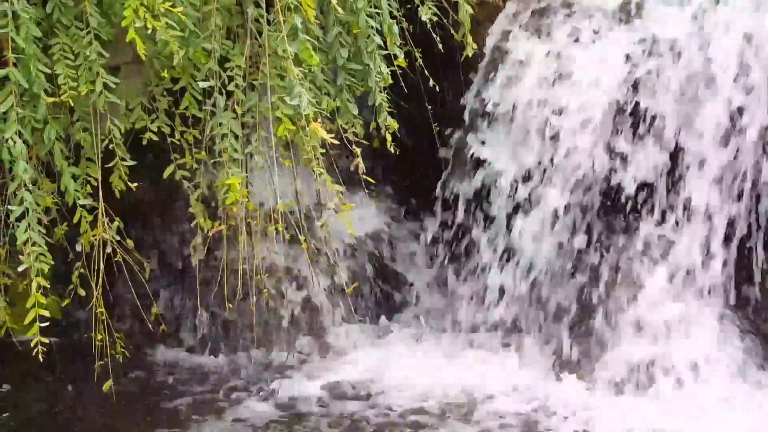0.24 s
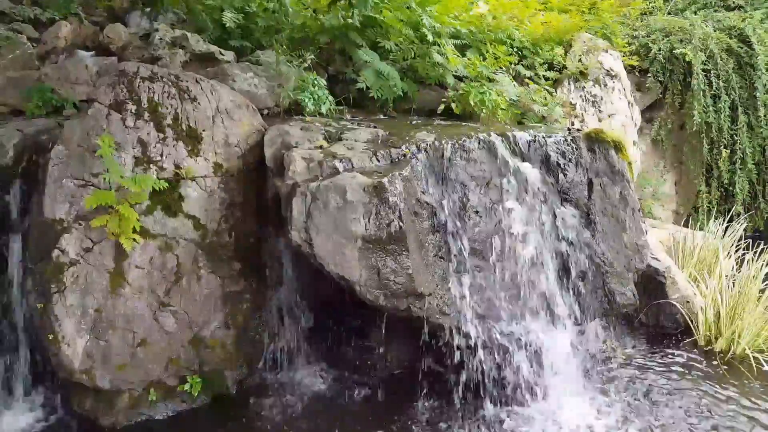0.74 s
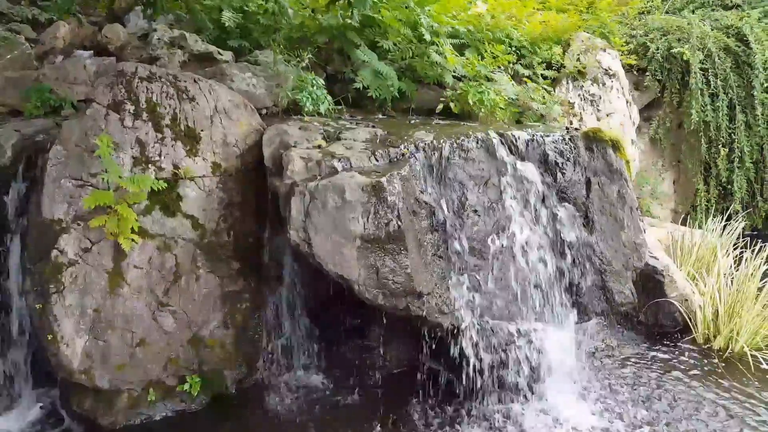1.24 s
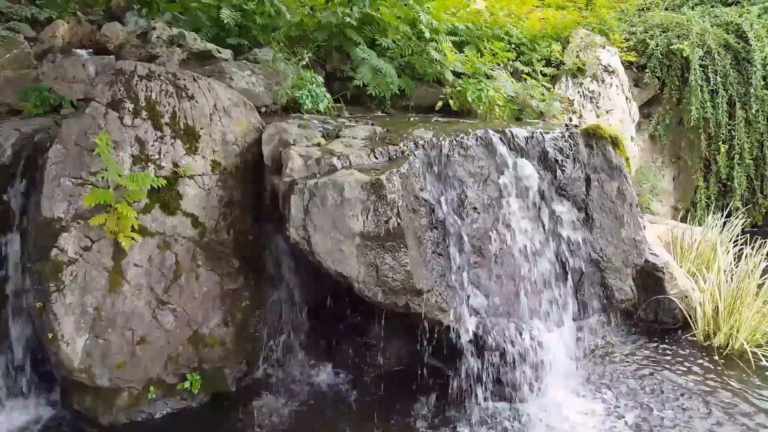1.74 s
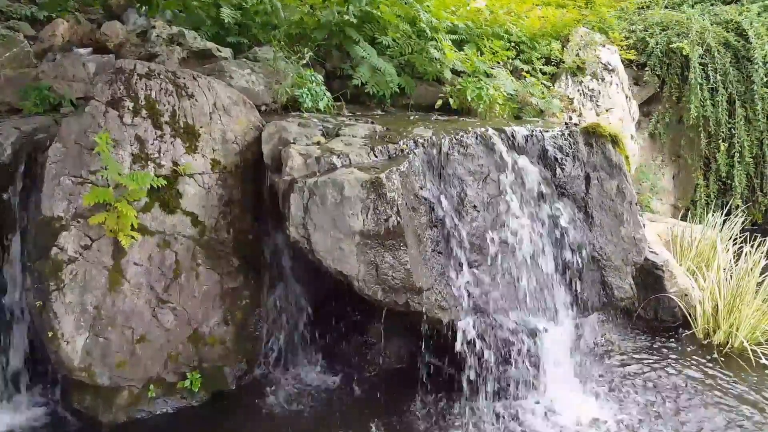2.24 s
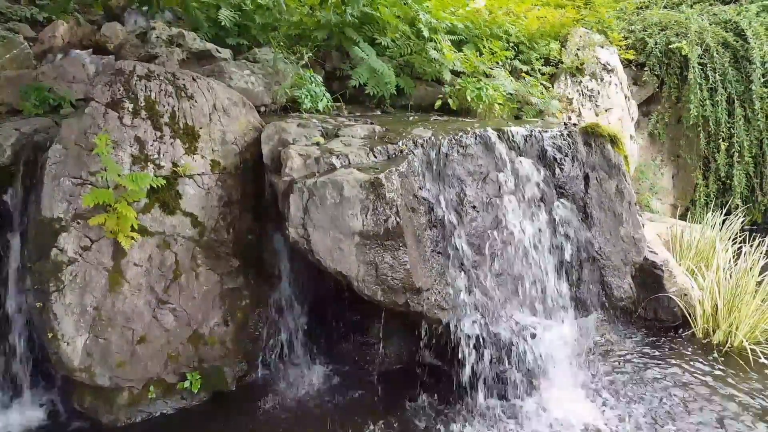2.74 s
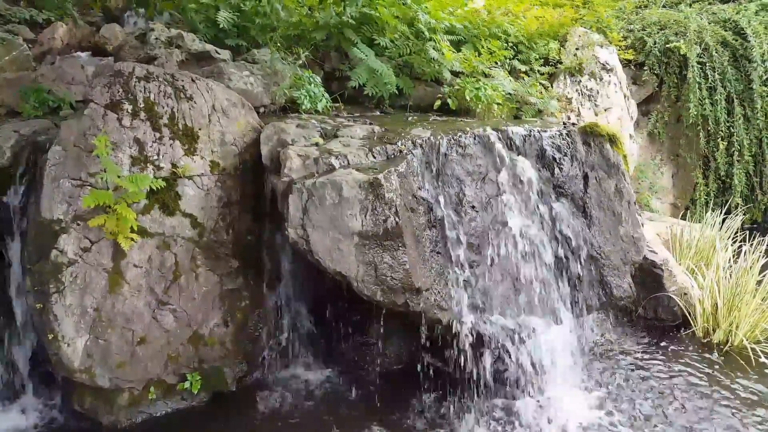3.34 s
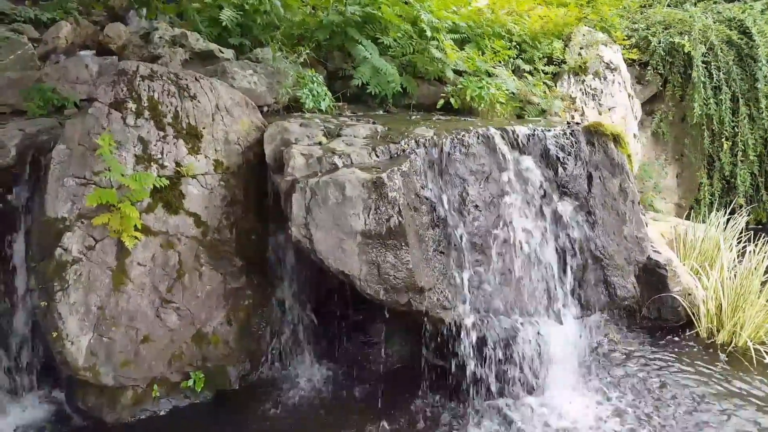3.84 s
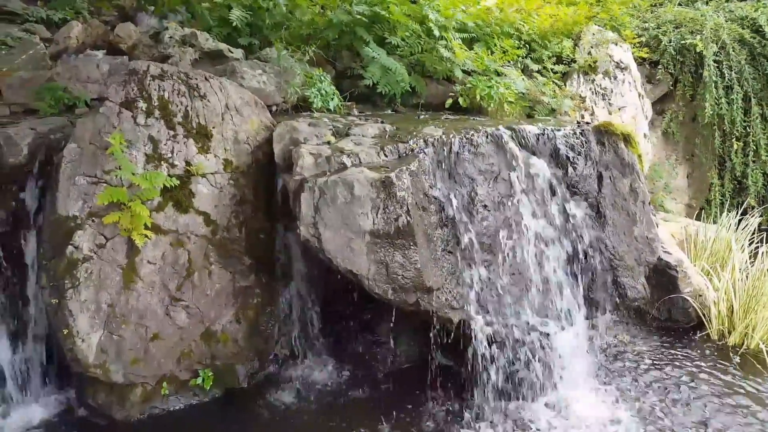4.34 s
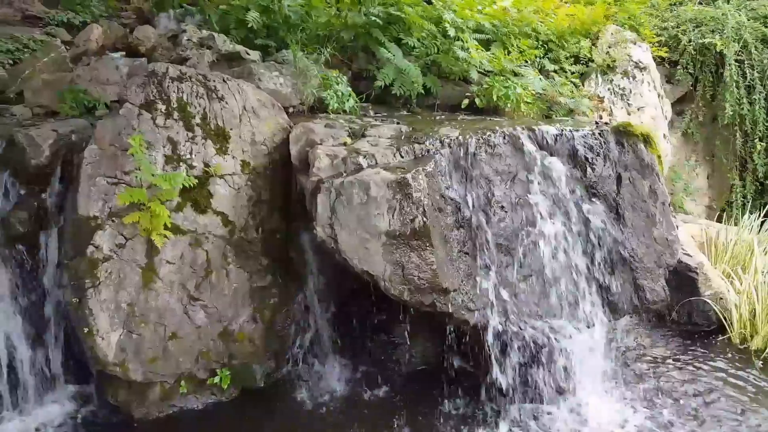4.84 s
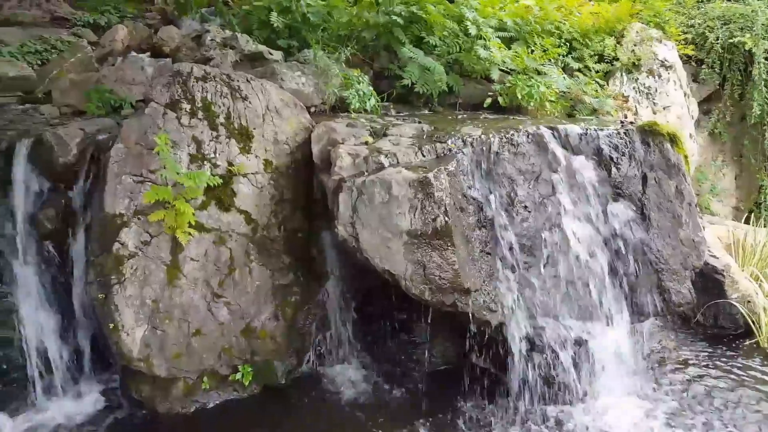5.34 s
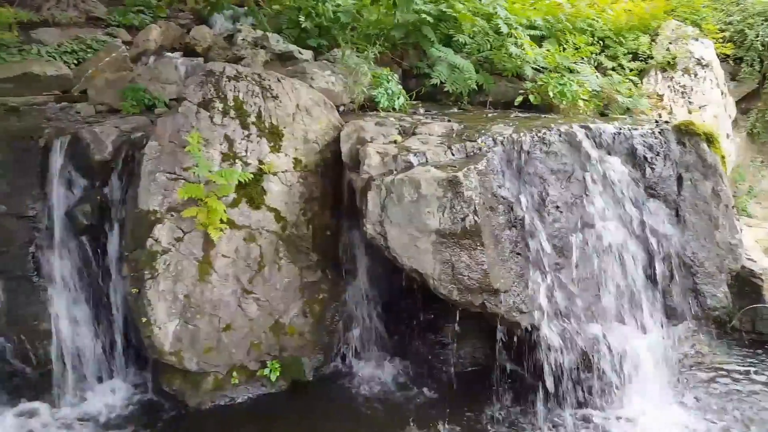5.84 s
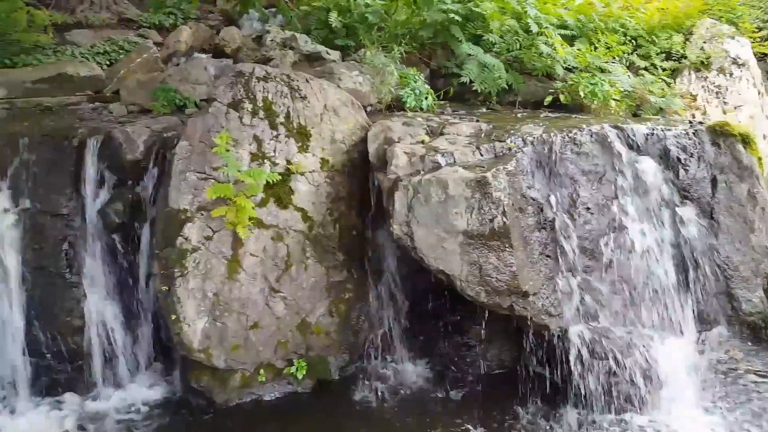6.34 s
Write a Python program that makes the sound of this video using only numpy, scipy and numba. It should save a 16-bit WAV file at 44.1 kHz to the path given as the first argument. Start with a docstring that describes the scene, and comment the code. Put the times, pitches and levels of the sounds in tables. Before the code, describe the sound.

Outdoors, close wide stereo. First a full, churning cascade dwindles, its bass thinning fastest, and is cut off before half a second. A very short complete silence follows. Then a steady splashing fall over stone enters at once and lasts to the end, with crisp spray, ringing foam, soft low gurgles and scattered watery plops, slightly brighter on the left.

```python
"""Two garden waterfalls in stereo from a pair of spaced microphones, with a short silence between them.
First a heavy chute fades and cuts off: coloured noise, ringing bubbles and droplets, the bass fading fastest.
After the silence, sheets of water spill off a rock ledge left of centre into a pool, made of the same layers.
The plunge rumbles, the foam rings and the spray hisses, following the flow and swelling band by band.
Single bubbles and drips plop out of the pool as decaying sines of climbing pitch."""
import sys
import numpy as np
from scipy import signal
from scipy.fft import rfft, irfft, next_fast_len
from scipy.io import wavfile
from numba import njit

SR = 44100
rng = np.random.default_rng(int(sys.argv[2]) if len(sys.argv) > 2 else 0)


def generate_wav(signal):
    """Clip the signal to [-1, 1] and save it as 16-bit WAV at the path in sys.argv[1]."""
    frames = np.transpose(np.atleast_2d(signal))
    scaled = np.clip(frames, -1, 1) * 32767
    pcm = np.round(scaled).astype(np.int16)
    wavfile.write(sys.argv[1], SR, pcm)


N = 290178

# Head start of the ledge's sound at the left microphone: (frequency [Hz], lead [ms])
LEDGE_LEAD = [(250, 0.051), (450, 0.37), (700, 0.17), (1120, 0.32), (1380, 0.4), (1720, 0.38), (2150, 0.45),
              (2600, 0.415)]
# How far plunge, gurgle, foam and spray follow the level of each fall:
# (frequency [Hz], chute share [ratio], ledge share [ratio])
FOLLOW_SHARES = [(200, 1.06, 0.42), (700, 0.91, 0.48), (2500, 0.94, 0.31), (8050, 0.9, 1.4)]


def ledge():
    """Sheets of water off the rock ledge: shared and separate churn, coloured and moved by the flow."""
    # Colour before the gain below: (frequency [Hz], left level [dB per Hz], right level [dB per Hz])
    colour = [(30, -93, -78), (60.3, -61.5, -61.5), (119, -60, -59.5), (266, -53.5, -54),
              (307, -57.5, -56.5), (485, -58.5, -57.5), (580, -53.5, -56.5), (680, -54.5, -54.5),
              (805, -54.5, -54.5), (990, -55.5, -55.5), (1180, -53.5, -55), (1430, -53.5, -55),
              (1580, -51.5, -55), (2040, -53, -56), (2430, -53.5, -58.5), (3830, -53.5, -59.5),
              (4430, -57.5, -61), (5370, -61, -60), (7060, -60.5, -63), (8860, -59, -62.5),
              (10200, -63, -64.5), (12200, -63, -61.5), (13700, -63.5, -61), (15200, -65.5, -68)]
    # How alike the two microphones hear it, apart from the lead: (frequency [Hz], likeness [0-1])
    likeness = [(60, 0.55), (120, 0.64), (255, 0.93), (340, 0.85), (500, 0.62), (690, 0.7), (860, 0.6),
                (1120, 0.39), (1380, 0.54), (1750, 0.35), (2150, 0.33), (2600, 0.25), (3100, 0.07),
                (4200, 0.15), (6900, 0.03)]
    return from_db(42.0) * water(colour, likeness, LEDGE_LEAD, ledge_level_db, SILENCE_START_S, N / SR)


def ledge_level_db(time, hz):
    """Each part of the water follows the flow by its share; swells move a band for a moment."""
    # Flow over the ledge, as level of the spray; only its departure from the median counts:
    # (time [s], level [dB])
    flow = [(0.63, -29), (0.78, -24.5), (0.94, -23), (0.96, -26), (1.89, -26), (1.99, -24.5), (4.85, -24.5),
            (4.99, -25.5), (5.02, -24.5), (6.35, -25.5), (6.53, -24), (6.58, -25.5)]
    # Swells in the pool: (peak time [s], length [s], centre frequency [Hz], rise [dB])
    swells = [(0.623, 0.02, 2500, 3), (0.623, 0.012, 6000, 2), (0.798, 0.063, 268, 7), (0.78, .1, 3400, 2),
              (0.83, 0.17, 2130, 2.5), (.96, .06, 3600, 1), (1.12, 0.08, 3800, 1), (1.28, 0.085, 2900, 1),
              (1.158, 0.14, 362, 5), (1.19, 0.12, 1880, 4.5), (1.5, 0.12, 400, 4), (1.65, 0.18, 170, 2.5),
              (1.797, 0.053, 130, 6), (1.817, 0.046, 550, 5), (2.6, 0.31, 140, 5.5), (2.75, 0.39, 1210, 1),
              (3.11, 0.13, 740, 2.5), (3.406, 0.15, 646, 4), (3.4, 0.11, 120, 6), (3.594, .12, 420, 5.5),
              (3.503, 0.11, 950, 1), (3.78, 0.082, 950, -1), (4.33, .2, 240, 3), (4.35, 0.28, 3400, 0),
              (5.5, 0.35, 1300, 1.5), (3.1, .08, 95, 8), (3.9, 0.11, 131, 10), (3.9, 0.22, 400, 2.5),
              (4.097, 0.29, 850, 2), (5.02, .08, 2100, 0.5), (5.028, 0.071, 150, 6), (5.2, .25, 260, 1.5),
              (5.366, 0.1, 200, 4), (5.603, 0.077, 2030, 1.5), (5.647, 0.084, 160, 8.5),
              (6.36, 0.075, 190, 6.5), (6.525, 0.091, 2200, 1.5), (6.52, .14, 900, 1.5)]
    swell_octaves = 0.32  # spread either side of the centre
    flow_s, flow_db = np.transpose(flow)
    flow_now_db = np.interp(time, flow_s, flow_db)
    level_db = at_hz(FOLLOW_SHARES, hz, axis=2) * (flow_now_db - np.median(flow_db))
    for peak_s, length_s, centre_hz, rise_db in swells:
        reach = np.exp(-.5 * (np.log2(hz / centre_hz) / swell_octaves) ** 2)
        shape = np.exp(-.5 * (2 * (time - peak_s) / length_s) ** 2)
        level_db = level_db + rise_db * reach * shape
    return level_db


def plops():
    """Single bubbles and drips ring in the pool as climbing, decaying sines, heard first on the left."""
    # The clearest plops: (time [s], pitch [Hz], starting height [dB])
    drips = [(.70, 1880, -28.5), (.735, 2570, -27), (.757, 2140, -26), (.775, 3510, -29), (.79, 300, -30),
             (.81, 2910, -27), (.812, 2230, -25), (.828, 1930, -23), (.876, 600, -25.5), (1.111, 2500, -25),
             (1.151, 369, -26), (1.175, 1410, -27), (1.31, 3940, -28.5), (1.795, 640, -26),
             (1.83, 254, -27), (2.89, 3330, -29), (3.07, 727, -30.5), (3.14, 3160, -30), (3.19, 750, -26),
             (3.34, 1490, -27), (3.39, 740, -30), (3.46, 2230, -21), (3.51, 580, -28), (3.579, 432, -32),
             (3.74, 1030, -26), (3.97, 885, -26), (4.049, 940, -27), (4.07, 670, -27), (4.127, 1885, -25),
             (4.17, 680, -30), (4.203, 3770, -31), (4.24, 2270, -24), (4.61, 3930, -18), (4.64, 2080, -23),
             (4.71, 2160, -25), (5.01, 170, -26.5), (5.07, 1630, -27), (5.175, 2270, -27),
             (5.321, 253, -25), (5.61, 2055, -26), (5.648, 3555, -28), (5.738, 3340, -28),
             (5.81, 2050, -29), (6.23, 4250, -33.5), (6.339, 200, -28), (6.455, 600, -25.5),
             (6.525, 2485, -26)]
    ring_s, ring_cycles = 0.18, 40  # time to fall 60 dB = seconds + cycles of the pitch
    rise = 0.12  # share by which the pitch would climb over those 60 dB
    start_s, hz, height_db = np.transpose(drips)
    t60 = ring_s + ring_cycles / hz
    out = np.zeros((2, N))
    for side, late_s in enumerate([0, at_hz(LEDGE_LEAD, hz) / 1000]):
        starts = ((start_s + late_s) * SR).astype(np.int64)
        add_rings(out[side], starts, 2 * np.pi * hz / SR, t60 * SR, from_db(height_db), rise)
    return out


def chute():
    """The heavy chute: shared and separate churn in its own colour, fading until the silence."""
    # Colour before fade and the gain below: (frequency [Hz], left level [dB per Hz], right level [dB per Hz])
    colour = [(45, -72, -72), (62, -68, -68.5), (95, -70, -71), (150, -67.5, -67), (193, -69, -70.5),
              (290, -65, -63), (350, -71, -72), (410, -72, -70), (530, -63.5, -67.5), (674, -64, -62),
              (850, -66.5, -69), (1000, -63, -65.5), (1190, -60.5, -64.5), (1700, -61, -66),
              (2180, -60, -64), (3300, -61, -67.5), (4000, -65, -66.5), (5260, -70, -69), (6900, -70, -75),
              (8200, -70.5, -70.5), (10100, -75.5, -77), (12000, -72, -70.5), (14800, -74, -71)]
    # How alike the two microphones hear it, apart from the lead: (frequency [Hz], likeness [0-1])
    likeness = [(60, 0.99), (120, 0.94), (255, 0.96), (340, 0.9), (450, 0.74), (680, 0.79), (1120, 0.67),
                (1450, 0.13), (2200, 0.25), (2600, 0.15), (3700, 0.32), (5000, 0.03)]
    # Head start at the left microphone: (frequency [Hz], lead [ms])
    lead = [(300, .12), (1000, 0.15), (1400, 0.23), (2200, 0.077), (3400, .17)]
    return from_db(45.5) * water(colour, likeness, lead, chute_level_db, 0, SILENCE_END_S)


def chute_level_db(time, hz):
    """The chute fades out, the bass a little faster."""
    fade_s, fade_power = 0.53, 0.76  # where the fade aims for zero; power 1 = straight fade of amplitude
    remaining = np.clip(1 - time / fade_s, .03, 1)
    fade_db = 20 * fade_power * np.log10(remaining)
    return at_hz(FOLLOW_SHARES, hz) * fade_db


def water(colour, likeness, lead, level_db, start_s, end_s):
    """Churn shared by both microphones as far as they are alike, then coloured and moved band by band."""
    # Unsteadiness of the stream: (frequency [Hz], depth per unit of unrest [dB])
    flicker = [(80, 3), (400, 1.34), (2000, 1), (10000, 0)]
    first = round(start_s * SR)
    size = next_fast_len(round(end_s * SR) - first, real=True)
    hz = np.maximum(np.arange(size // 2 + 1) * SR / size, 1)

    shared, left, right = (rfft(churn(size)) for _ in range(3))
    alike = np.clip(at_hz(likeness, hz), 0, 1)
    late = np.exp(-2j * np.pi * hz * at_hz(lead, hz) / 1000)  # delays the right side
    common = np.sqrt(alike) * shared * [np.ones_like(late), late]
    pair = common + np.sqrt(1 - alike) * np.array([left, right])
    colour_gain = from_db([at_hz(colour, hz), at_hz(colour, hz, axis=2)])
    low_cut = np.minimum(hz / colour[0][0], 1) ** 2  # 12 dB per octave below the first row
    pair = pair * colour_gain * low_cut

    coarse = np.arange(0, size, 40)
    time = start_s + coarse / SR
    surge, splatter = drift(7.4, len(time)), drift(40.0, len(time))  # common to all bands
    centres = np.geomspace(60, 12000, num=17)
    out = 0
    for k, centre in enumerate(centres):
        # Triangular bands on a log axis add up to one
        band = np.interp(np.log(hz), np.log(centres), np.arange(len(centres)) == k)
        unrest = 0.23 * surge + 0.18 * splatter + 0.58 * drift(9.7, len(time))
        gain = from_db(level_db(time, centre) + at_hz(flicker, centre) * unrest)
        out = out + irfft(pair * band, size) * np.interp(np.arange(size), coarse, gain)
    whole = np.zeros((2, N + size))
    whole[:, first:first + size] = out
    return whole[:, :N]


def churn(size):
    """Falling water before its colour: white rush, foam bubbles and droplets."""
    # Foam bubbles ring long and tonally; droplets ring briefly
    foam = bubbles(size, per_s=1400, cycles=17, ring_s=0.045, spread_db=2)
    drops = bubbles(size, per_s=500, cycles=6.9, ring_s=0.0031, spread_db=3)
    return rng.standard_normal(size) + from_db(-6.5) * foam + from_db(-12) * drops


def bubbles(size, per_s, cycles, ring_s, spread_db):
    """Bubbles born at random ring at pitches set by their size, with equal power per Hz on average."""
    rise = 0.015  # share by which pitch would climb over 60 dB of decay, as the bubble nears the surface
    when, small, strong = rng.random((int(per_s * size / SR), 3)).T
    hz = 120 + 15000 * small ** 2
    t60 = cycles / hz + ring_s
    strength_db = spread_db * np.minimum(-np.log(1 - strong), 5)
    heights = from_db(strength_db) * np.sqrt(np.sqrt(hz) / t60)  # evens out the power per Hz
    out = np.zeros(size)
    add_rings(out, (when * size).astype(np.int64), 2 * np.pi * hz / SR, t60 * SR, heights, rise)
    return rms_one(out)


@njit
def add_rings(out, starts, step, steps, heights, rise):
    """Adds decaying sines of climbing pitch, each a turning, shrinking pointer followed down 30 dB."""
    # step: radians per sample; steps: samples to fall 60 dB
    for k in range(len(starts)):
        pointer = heights[k] + 0j
        turn = 1000. ** (-1 / steps[k]) * np.exp(1j * step[k])
        climb = np.exp(1j * step[k] * rise / steps[k])
        for i in range(starts[k], min(starts[k] + int(steps[k] / 2), len(out))):
            out[i] += pointer.imag
            pointer *= turn
            turn *= climb


def drift(rate_hz, size):
    """Slow chance at every 40th sample: noise through a double one-pole low-pass, scaled to rms 1."""
    r = np.exp(-80 * np.pi * rate_hz / SR)
    run_in = 2000
    noise = rng.standard_normal(size + run_in)
    return rms_one(signal.lfilter([1], [1, -2 * r, r * r], noise)[run_in:])


def from_db(db):
    """Decibels to gain."""
    return 10 ** (np.asarray(db) / 20)


def rms_one(x):
    """Scales to rms 1."""
    return x / np.sqrt(np.mean(x ** 2) + 1e-20)


def at_hz(points, hz, axis=1):
    """Reads a column of a table on a log-frequency axis."""
    points = np.array(points)
    return np.interp(np.log(hz), np.log(points[:, 0]), points[:, axis])


SILENCE_START_S, SILENCE_END_S = .489, .6205


def scene():
    """The chute, silence, then the ledge with its plops."""
    edge_s = .001  # length of the ramp on either side of the silence
    time = np.arange(N) / SR
    chute_gate = np.clip((SILENCE_START_S - time) / edge_s + .5, 0, 1) ** 2
    ledge_gate = np.clip((time - SILENCE_END_S) / edge_s + .5, 0, 1) ** 2
    return chute() * chute_gate + (ledge() + plops()) * ledge_gate


def record(dry):
    """Soft saturation rounds the highest peaks, then a steep low-pass cuts the top."""
    overload, cutoff_hz = .8, 15350  # overload: ceiling of the saturation, full scale = 1
    rounded = overload * np.tanh(dry / overload)
    low_pass = signal.ellip(12, .5, 90, cutoff_hz, fs=SR, output="sos")
    return signal.sosfilt(low_pass, rounded)


dry = scene()
out = record(dry)
generate_wav(out)
```